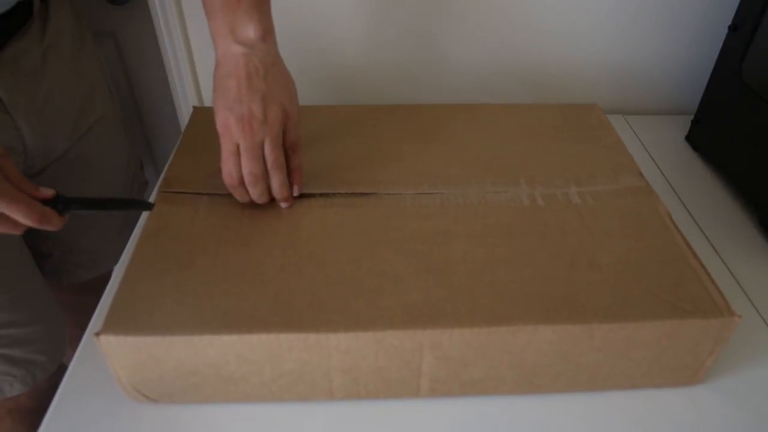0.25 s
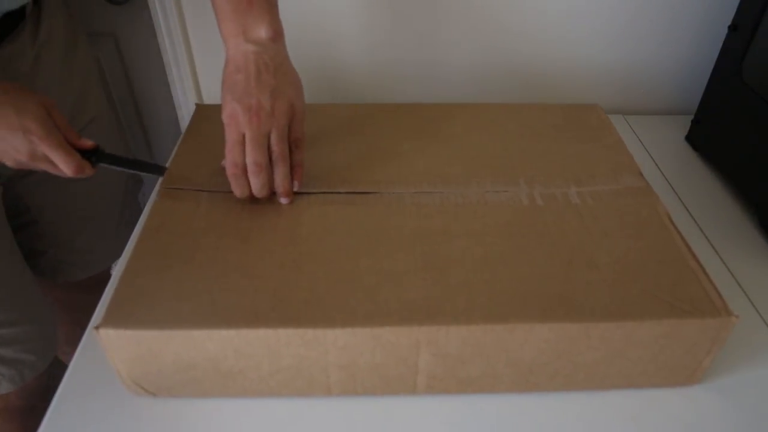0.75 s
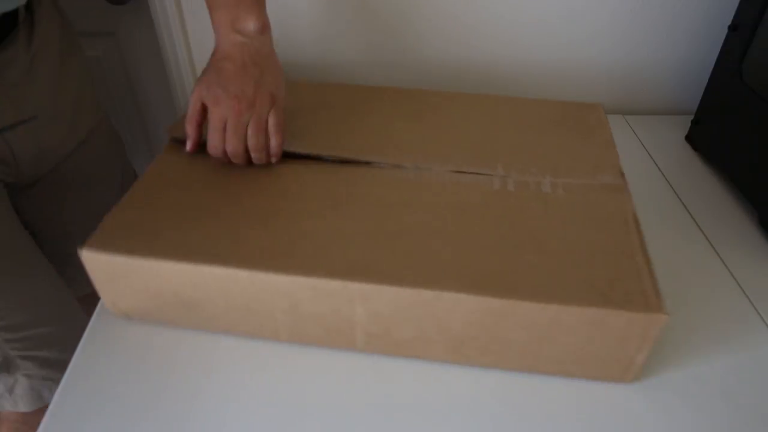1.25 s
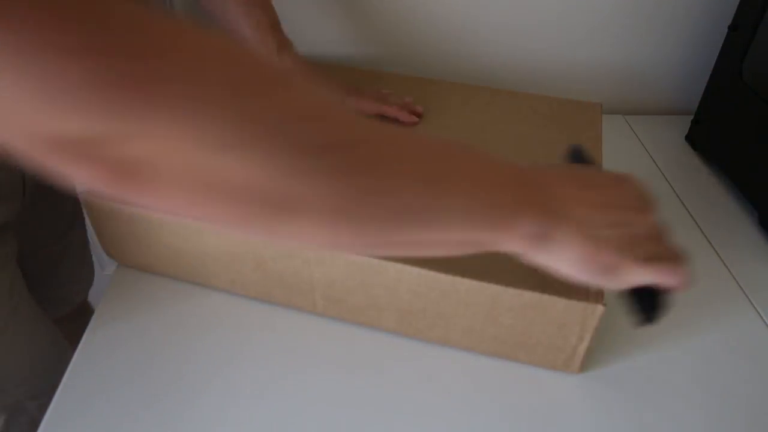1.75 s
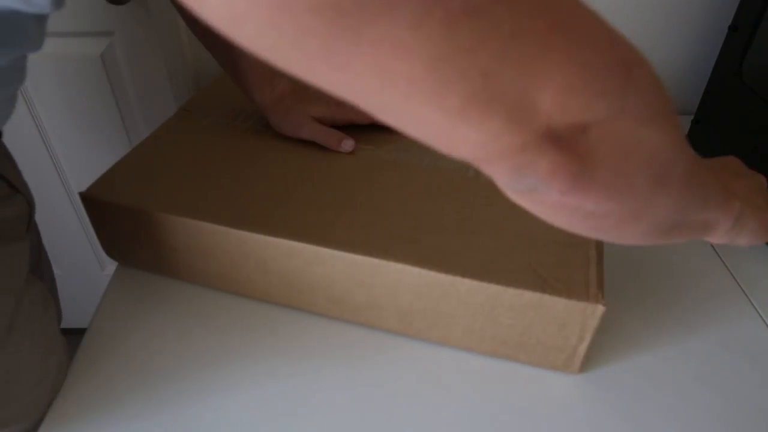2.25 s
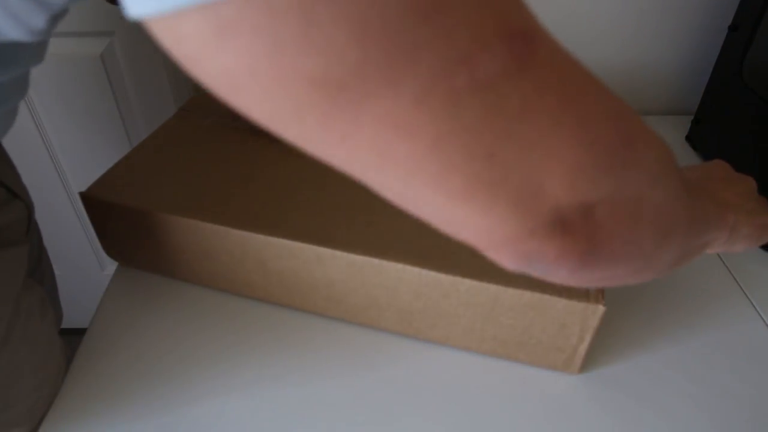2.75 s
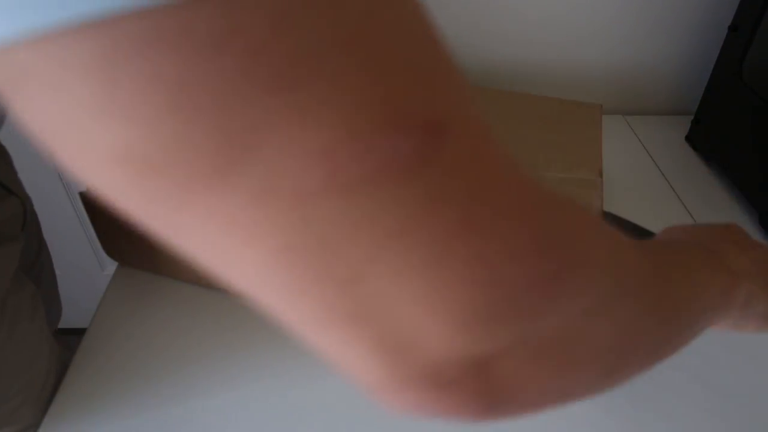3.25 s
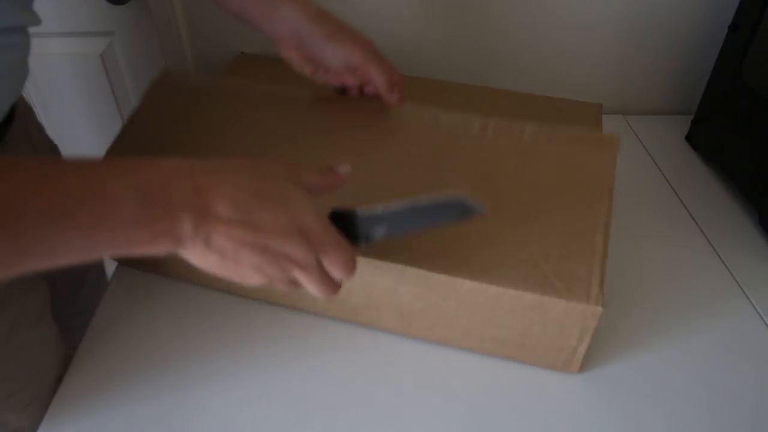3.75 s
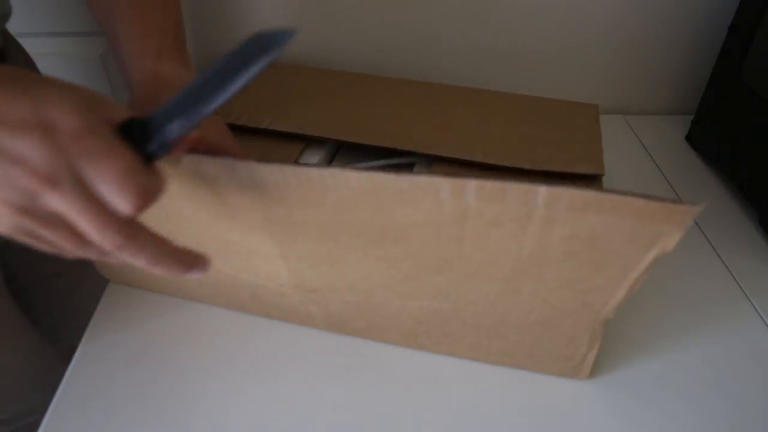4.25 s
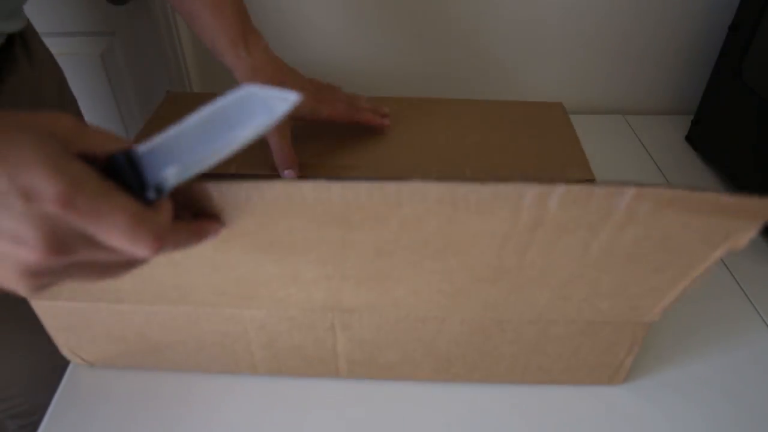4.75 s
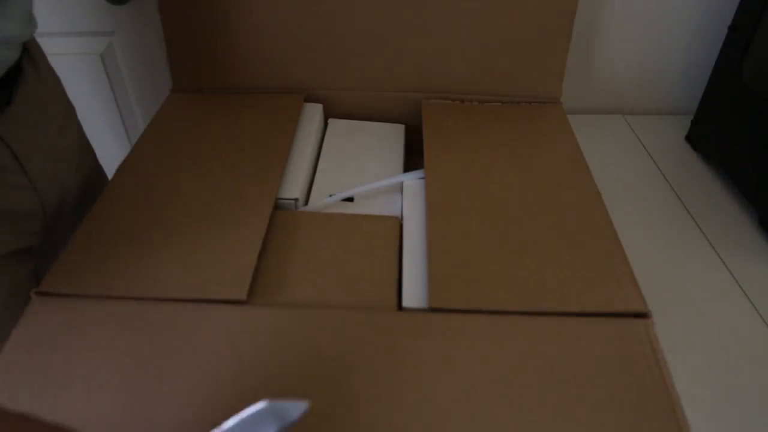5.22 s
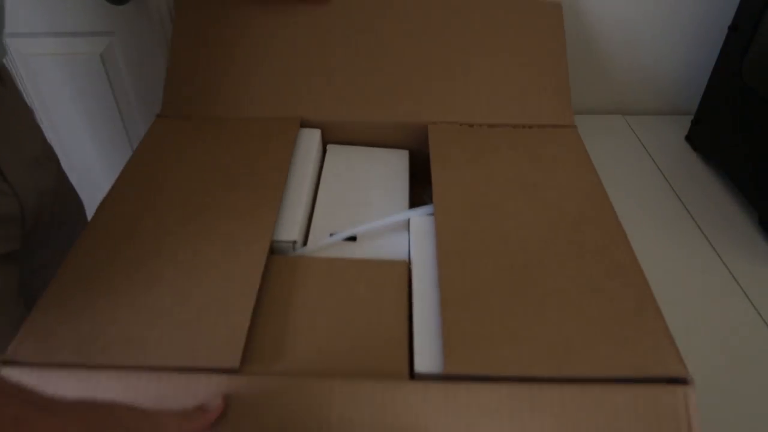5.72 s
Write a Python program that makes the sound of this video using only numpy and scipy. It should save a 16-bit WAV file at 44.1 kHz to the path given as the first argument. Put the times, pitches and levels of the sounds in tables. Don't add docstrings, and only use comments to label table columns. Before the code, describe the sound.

Close, mono, in a small quiet room with a faint low background hum. From 0 to 0.5 s a hand barely rustles on cardboard, with a light tick. From about 0.56 to 1.1 s a knife gives short, dry, grainy rasps through tape, ending in a crisp crack. From 1.15 to 1.6 s the box drags round with a louder scrape, a sharp snap at 1.4 and a hollow thump at 1.5; another strong crack comes near 1.65. Sparse cuts, bumps and faint steel scrapes follow until 2.9. A last cut at 3.0-3.3 bursts into quick bright cracks. Fingers fumble and tick softly, then a flap slides and creaks from 4.1 to 4.7, ending in a very loud, short, dull knock at 4.74. The far flap folds with a lighter rustle around 4.9-5.2, a knock sounds at 5.4, and a rough scraping pull swells from 5.6, with snaps and thumps at 5.9.

```python
import sys
import numpy as np
from scipy import signal
from scipy.fft import rfft, irfft
from scipy.io import wavfile
from scipy.ndimage import uniform_filter1d, map_coordinates

SR = 44100
rng = np.random.default_rng(int(sys.argv[2]) if len(sys.argv) > 2 else 0)


def makeup_ratio(level_db):
    decades = np.asarray(level_db, float) / 20
    return 10 ** decades


def store_wav(level_fs):
    pcm = np.round(np.clip(np.atleast_2d(level_fs), -1, 1) * 32767)
    wavfile.write(sys.argv[1], SR, pcm.T.astype(np.int16))


N = 263718
TIME = np.arange(N) / SR

# [pitch_hz, density_db per Hz]
QUIET_SPECTRUM = [(18, -29), (30, -7.5), (174, -2.5), (287, -19), (473, -17), (2350, -29), (10200, -31.5),
                  (11400, -29), (16000, -32)]
# [pitch_hz, t60_s]
ROOM_DECAY = [(100, 0.41), (1000, 0.0833), (4000, 0.1945), (12000, 0.067)]
# [pitch_hz, gain_db]
MIC_LIMIT = [(15700, 0), (15900, -22), (16350, -26), (16500, -90)]

# [pitch_hz, density_db per Hz]
SCRAPE_SPECTRUM = [(700, -51.5), (1200, -4.5), (1500, 3), (2000, 4.5), (2550, 1), (3000, 3.5), (3500, 7),
                   (3950, 2.5), (4500, -6), (5500, -16), (7200, -42.5), (12000, -82)]
# [pitch_hz, density_db per Hz]
HISS_SPECTRUM = [(2940, -15.5), (5000, -2.5), (7560, -3.5), (9550, -5.5), (10900, -5), (14700, -16),
                 (16000, -14)]
# [pitch_hz, density_db per Hz]
TAPE_SPECTRUM = [(700, -45), (1200, -7), (1600, 1), (2100, 2), (2600, 1), (3300, 6.5), (4000, 3),
                 (4600, -6), (5500, -16), (7200, -43.5)]
# [pitch_hz, width_hz, level_db]
PANEL_MODES = [(400, 175, 3), (590, 191, 4), (738, 249, 1), (1242, 390, -6.5)]
# [pitch_hz, width_hz, level_db]
HOLLOW_MODES = [(81, 11, -4.5), (142, 26, 1.5), (210, 50.5, 2), (268.6, 55, 4)]
# [pitch_hz, level_db, t60_s]
AIR_MODES = [(135, -3, 0.14), (280, -13, 0.1308), (454, -19.5, 0.12), (600, -13.5, 0.04)]
# [pitch_hz, width_hz, level_db]
BLADE_MODES = [(4450, 90, -9), (5000, 140, -11), (6060, 160, -6), (7480, 220, 0), (8640, 200, -15),
               (9750, 240, -11)]

# [start_s, level_db (peak), pitch_hz, t60_s]
DRUM_BLOWS = [(1.28, -35, 174, 0.051), (1.502, -15, 253, 0.082), (1.626, -29.5, 185, 0.058),
              (1.851, -31.5, 210, .061), (2.605, -36, 135, 0.12), (2.8096, -24.5, 195, 0.032),
              (3.151, -43, 319, .104), (3.181, -35.5, 210, 0.12), (3.703, -38, 197.6, 0.14),
              (3.747, -33, 193, 0.15), (3.763, -30, 90, 0.1), (4.172, -40.5, 157, 0.056),
              (4.514, -40.5, 85.5, 0.12), (4.867, -35, 107, 0.057), (5.9, -34, 400, 0.2),
              (5.935, -39, 290, .092), (1.41, -32.5, 215, 0.11), (1.335, -38, 110, 0.074),
              (2.385, -53.5, 200, 0.066), (2.606, -44, 138, .2), (2.81, -38, 138, .2), (3.2, -38, 250, .08)]
# [start_s, level_db (peak), pitch_hz, t60_s]
DAMPED_KNOCKS = [(.438, -42.5, 145.8, 0.1), (1.409, -22, 590, 0.041), (1.831, -29.5, 136.6, .0466),
                 (2.096, -22, 454, 0.02), (2.604, -32, 294, 0.021), (3.252, -37.5, 636, 0.017),
                 (3.254, -33, 1084, 0.02), (3.309, -42, 400, .042), (3.503, -38, 232, 0.037),
                 (4.034, -56, 145, 0.36), (4.7383, -0.5, 101, 0.02), (4.763, -31, 268, 0.037),
                 (4.812, -32.5, 180, .05), (4.842, -37, 130, .05), (2.096, -40, 715, 0.019),
                 (2.108, -36, 523, .04), (2.124, -39, 400, 0.037), (2.606, -40, 696, 0.019),
                 (2.795, -35.5, 400, .015), (2.81, -36, 750, 0.017), (5.399, -29.5, 423, 0.014),
                 (5.426, -33.5, 616, 0.018), (5.905, -35.5, 140, 0.11), (3.68, -44, 145, 0.09),
                 (3.735, -36, 142, .14), (4.9, -40, 230, .06), (2.384, -52, 480, .03),
                 (1.47, -39, 205, 0.049), (5.11, -39, 109, .047), (5.124, -36, 105, 0.064),
                 (5.392, -20.5, 337, 0.013), (5.956, -28.5, 210, .09)]
# [start_s, level_db (peak), pitch_hz, t60_s]
DESK_BUMPS = [(1.513, -25, 44.6, 0.15), (1.5, -45.5, 37, 0.24), (1.5, -50.5, 45, .17),
              (4.744, -21, 51, .141), (5.406, -17, 63, 0.057), (5.58, -51, 45, .177),
              (3.64, -49, 80, 0.092), (3.385, -53.5, 56, 0.09), (5.91, -38.5, 63, .12)]

# [start_s, end_s, level_db, pitch_hz (centre)]
SKIN_BRUSHES = [(1.14, 1.567, -56.5, 7500), (1.22, 1.5, -54, 3500), (1.2, 1.55, -58, 5000),
                (4.113, 4.177, -51.5, 7700), (4.117, 4.176, -52.5, 3020), (4.167, 4.22, -63, 10500),
                (4.28, 4.498, -61, 10400), (4.535, 4.6, -62, 12500), (4.54, 4.768, -60.5, 10700),
                (4.895, 4.994, -63, 10500), (5.604, 5.9, -64.5, 7950), (3.04, 3.3, -65, 11000),
                (2.59, 2.626, -69, 12000), (2.78, 2.83, -66, 12000), (5.4, 5.44, -68, 10500)]
# [start_s, end_s, level_db, pitch_hz]
CREASE_SQUEAKS = [(3.0, 3.135, -58, 3620), (4.25, 4.58, -55.5, 3490), (4.5, 4.76, -59, 3560),
                  (3.28, 3.375, -58.5, 8000), (0.3, 0.38, -72, 1760), (2.196, 2.321, -61, 1780),
                  (2.12, 2.332, -60, 520), (0.061, 0.25, -78, 1040), (5.9, 6.0, -41.5, 1150),
                  (3.85, 3.93, -62, 1150), (3.79, 3.83, -53, 2080), (3.79, 3.88, -61, 1400),
                  (5.52, 5.56, -55.5, 700), (3.6, 3.64, -66, 2050), (3.8, 3.88, -55, 349),
                  (4.035, 4.122, -61.5, 293), (4.028, 4.11, -62.5, 1430), (4.95, 5.07, -57, 1800),
                  (5.142, 5.175, -58, 2195), (5.157, 5.234, -63, 586), (5.19, 5.27, -60.5, 1400),
                  (5.235, 5.29, -62, 1360), (5.24, 5.3, -60, 3600), (3.6, 3.625, -62, 4000),
                  (0.45, .55, -63, 3700), (2.545, 2.605, -72, 1600), (2.53, 2.605, -68, 430),
                  (2.777, 2.8, -61, 1600), (2.243, 2.263, -50, 1860), (.437, 0.459, -51, 1095),
                  (0.285, 0.35, -70.5, 3500), (2.96, 3.02, -70, 497), (3.875, 3.9, -60, 5500),
                  (4.895, 4.915, -51, 505), (4.864, 4.885, -54, 870), (.72, .78, -52, 374),
                  (1.2, 1.4, -50, 1150), (4.45, 4.75, -58, 800), (5.515, 5.54, -61, 4300),
                  (5.471, 5.523, -52, 1280), (5.497, 5.552, -47.5, 1374)]
# [start_s, end_s, level_db, pitch_hz]
THIN_TONES = [(4.17, 4.58, -54, 3500), (4.0, 4.12, -66, 3650), (4.55, 4.75, -58, 3500),
              (2.245, 2.31, -66, 4430), (2.1, 2.128, -65, 6000), (2.1, 2.124, -66, 5050),
              (2.258, 2.293, -55.5, 480), (5.005, 5.06, -64, 1950), (5.08, 5.19, -65, 3250),
              (5.2, 5.3, -65, 1400), (3.86, 3.95, -60.5, 1155), (3.69, 3.73, -55, 3250),
              (3.47, 3.53, -60, 3250), (3.83, 3.87, -62, 3420), (0.275, 0.327, -68, 965)]

# [start_s, level_db (peak), brightness_db]
TAPE_PEELS = [(.5906, -33.5, 2.5), (.8454, -38, 4.5), (.8854, -44.5, 1.5), (.9773, -49.5, 8),
              (1.2278, -29.5, -10), (1.4049, -12.5, -9), (1.4181, -28, -1), (1.5808, -30.5, -14),
              (1.707, -22.5, -10), (1.8514, -38, -25), (1.9011, -35.5, -4), (2.0957, -38.5, -23.5),
              (2.5981, -31.5, -12.5), (3.1053, -28, -9), (3.6031, -47, -7), (4.1502, -35, -2),
              (4.796, -36, -5.5), (5.247, -38, -9), (5.3908, -33, -13), (5.9358, -22, -5.5)]
# [start_s, level_db (peak), brightness_db]
TAPE_SNAPS = [(.0438, -52, -5), (.2824, -47.5, -7), (.4374, -35.5, -12.5), (.5028, -34.5, -12.5),
              (.8342, -41, -8), (1.0086, -31.5, -4.5), (1.274, -30, -14), (1.3598, -33, -18.5),
              (1.6377, -35, 4.5), (1.8307, -32.5, -13), (1.9455, -29.5, -11), (2.251, -40.5, -8.5),
              (2.787, -42, -2.5), (2.794, -39, -1), (3.2523, -30, -29), (3.3667, -32.5, -5.5),
              (3.7483, -45, -23), (4.118, -40, 6), (4.8667, -27.5, -20), (5.9008, -21.5, -1.5)]
# [start_s, level_db (peak), brightness_db]
CREASE_BUCKLES = [(.3348, -56, -11), (.6233, -40, 7.5), (.6966, -49, -14.5), (.7484, -38.5, -15),
                  (1.499, -22, -16), (1.6267, -33.5, -8), (2.3815, -54, -1), (2.5489, -63.5, -7),
                  (2.8065, -34, -25), (3.2184, -34.5, 4.5), (3.3088, -52, -3), (3.4471, -50, -15),
                  (3.5015, -45, -1), (3.5432, -43.5, -21.5), (3.7042, -38, -24), (3.7316, -36, -22.5),
                  (3.7644, -42, -22), (3.7978, -41, -3), (3.8767, -51, -4), (4.7383, -30, -7.5),
                  (4.8963, -43, -17.5), (5.3767, -47, -16), (5.3985, -34, -27), (5.4255, -40, -18),
                  (5.455, -47, -20), (5.475, -47, -20)]
# [start_s, level_db (peak), brightness_db]
TAPE_CRACKS = [(1.0258, -22, -0.5), (1.6552, -12.5, -14.5), (3.1415, -24, -6), (3.1618, -18, 0.5),
               (3.1787, -18.5, -1.5)]
# [start_s, level_db (peak), brightness_db]
FINGER_TICKS = [(.4945, -46, 14), (.504, -36, -12), (1.0268, -24, -2), (1.5, -28, -14), (1.831, -36, -10),
                (3.447, -46, -12), (3.503, -44, -12), (2.255, -42, -6), (3.4687, -48, -10),
                (3.654, -47, -7), (3.718, -38, -14), (3.733, -34, -8), (3.747, -33, -12), (3.762, -35, -14),
                (3.845, -44, -12), (3.885, -44, -6), (4.118, -40, 0), (3.181, -30, -12), (.745, -38, -6),
                (.835, -40, -6), (5.392, -34, -10), (5.401, -34, -12), (3.8, -45, -8), (4.739, -46, -8),
                (4.757, -42, 0), (4.857, -50, -2), (5.41, -42, -7), (5.518, -44, -12), (3.11, -35.5, -6),
                (3.225, -37, -6), (1.52, -38, -4)]

# [start_s, end_s, level_db, pitch_ratio to the blade at rest]
BLADE_STROKES = [(2.09, 2.129, -75, 1.0), (2.17, 2.27, -63, 1.005), (2.236, 2.268, -62, .965),
                 (2.374, 2.409, -73.5, 0.96), (2.597, 2.609, -56.5, 1.0), (2.783, 2.824, -57, 1.0),
                 (2.54, 2.56, -76, 1.0)]
# [time_s, speed_db, weight_db (on the card, over the speed)]
LONG_SLIDES = [
    (-4.5, -1.5, [(0, -81.5, 8.5), (.116, -73.5, 5), (.31, -89, 7), (.54, -71, 4), (.708, -66, 4.5), (.81, -69.5, 4), (1.11, -77, 2)]),
    (-6.5, 3, [(1.11, -66.5, -4), (1.2, -52.5, -6), (1.304, -46.5, -2), (1.456, -47, -1.5), (1.526, -47, 8), (1.6, -67, 10.5), (1.666, -62, 9.5), (1.8, -83, -8)]),
    (-14, -1.5, [(1.8, -76, -1), (1.876, -57, -11), (1.924, -74, 3), (2.066, -66, 5), (2.156, -70.5, 12.5), (2.282, -85, 15.5), (2.35, -85, -2)]),
    (-2, 3.5, [(2.95, -87, 6), (3.078, -60, -1.5), (3.184, -55.5, 8.5), (3.234, -55.5, 5.5), (3.302, -61, 1), (3.42, -79.5, 4)]),
               (-1.5, 2.5, [(3.42, -80, 8.6), (3.542, -68.5, 11.7), (3.692, -77.5, 2.7), (3.736, -74.5, 31.6), (3.812, -70, 4.5), (3.878, -63, 2), (3.98, -81.5, 2.2)]),
    (-8.5, -3, [(3.98, -74, -6), (4.092, -63, 0), (4.15, -53, 2.5), (4.252, -57, -2.5), (4.302, -52, -4.5), (4.58, -51, -2), (4.72, -49, -4.5), (4.77, -54, 9), (4.85, -67.5, 3)]),
    (-8.5, -8, [(4.85, -69.5, 18), (4.924, -51, 2), (5.018, -58, 1), (5.12, -59.5, 2.5), (5.218, -64.5, -2), (5.33, -75.5, 5)]),
    (-11, -3, [(5.33, -78, 4), (5.446, -66.5, 12), (5.558, -63.5, 10.5), (5.658, -49.5, -1.5), (5.774, -45.5, -0.5), (5.862, -48, 1), (5.98, -59, -4)]),
]
# [start_s, end_s, speed_db, weight_db]
SAW_STROKES = [(.561, .616, -52.5, 3), (.602, .665, -51.5, 2.5), (.703, .792, -54, 6),
               (.819, .927, -57.5, 8.5), (.958, 1.099, -53.5, -1), (1.829, 1.917, -59.5, 4),
               (1.893, 1.99, -52, 1), (2.559, 2.684, -67, 10.5), (2.771, 2.88, -63.5, 8.5),
               (3.123, 3.234, -49.5, 4), (4.115, 4.19, -53, -16)]
# [start_s, end_s, speed_db, weight_db]
HAND_PRESSES = [(.265, .408, -81.5, 11), (2.175, 2.291, -72, 15), (3.431, 3.609, -61.5, -8),
                (3.643, 3.845, -56, 6), (3.814, 3.927, -64.5, 3), (5.508, 5.547, -54, -2),
                (5.893, 6.011, -41, 6.5)]


def unit(x):
    return x / np.sqrt(np.mean(x ** 2) + 1e-20)


def along(points, hz):
    f, v = np.transpose(points)
    return np.interp(np.log(hz + 1), np.log(f + 1), v)


def wobble(rate):
    knots = rng.standard_normal(int(N * rate / SR) + 4)
    return map_coordinates(knots, [TIME * rate])


def response(shape):
    f = np.fft.rfftfreq(2 ** 14, 1 / SR)
    if len(shape[0]) == 3:
        spectrum = 0
        for k, (hz, width, db) in enumerate(shape):
            resonance = 1j * f * width / (hz * hz - f * f + 1j * f * width)
            spectrum = spectrum + (-1) ** k * makeup_ratio(db) * resonance
        h = irfft(spectrum)
    else:
        cepstrum = irfft(np.log(makeup_ratio(np.maximum(along(shape, f), -70))))
        cepstrum[1:len(f) - 1] *= 2
        cepstrum[len(f):] = 0
        h = irfft(np.exp(rfft(cepstrum)))
    return h[:len(f)] / np.linalg.norm(h[:len(f)])


def through(shape, x):
    return signal.fftconvolve(x, response(shape))[:N]


def swell(start, end, edge=1.8, lean=.722):
    out, span = np.zeros(N), slice(int(start * SR), int(end * SR))
    progress = np.clip((TIME[span] - start) / (end - start), 0, 1)
    out[span] = np.abs(np.sin(np.pi * progress ** lean)) ** edge
    return out


def bending(x, depth_db, bins=2, frames=8):
    z = signal.stft(x, nperseg=512)[2]
    field = rng.standard_normal(z.shape)
    for axis, size in enumerate((bins, frames)):
        field = uniform_filter1d(field, size, axis)
        field = uniform_filter1d(field, size, axis)
    gain = makeup_ratio(depth_db * unit(field))
    gain = gain / np.sqrt(np.mean(gain ** 2))
    return signal.istft(z * gain, nperseg=512)[1][:N]


def grains(clump_db, tick_db, bend_db):
    clumps = clump_db * (wobble(30) + 0.3 * wobble(120))
    slips = tick_db * np.abs(wobble(700))
    return unit(makeup_ratio(clumps + slips) * bending(rng.standard_normal(N), bend_db))


def background_quiet():
    return makeup_ratio(-71.5 + 0.4 * wobble(5)) * through(QUIET_SPECTRUM, rng.standard_normal(N))


def room(x):
    out, step = np.zeros(N + SR), SR // 3
    delay = 180
    for k in range(0, N, step):
        hz, t, z = signal.stft(rng.standard_normal(SR // 3), SR, nperseg=256)
        decay = makeup_ratio(-60 * t / along(ROOM_DECAY, hz)[:, None])
        tail = signal.istft(z * decay, SR, nperseg=256)[1]
        wet = signal.fftconvolve(x[k:k + step], tail / np.linalg.norm(tail))
        out[k + delay:][:len(wet)] += wet
    return out[:N]


def thumps():
    out, t = np.zeros(N + SR), np.arange(SR // 2) / SR
    # how much the air rings, dB
    for rows, air_db in ((DRUM_BLOWS, -4.5), (DAMPED_KNOCKS, -20), (DESK_BUMPS, -19.5)):
        for s, db, hz, t60 in rows:
            panel = makeup_ratio(-60 * t / t60) * np.sin(2 * np.pi * hz * t)
            air = np.zeros(len(t))
            for f, level, ring in AIR_MODES:
                level_chance, pitch_chance = rng.standard_normal(2)
                fall = makeup_ratio(air_db + level + 1.9 * level_chance - 60 * t / ring)
                air += fall * np.sin(2 * np.pi * f * (1 + 0.013 * pitch_chance) * t)
            onset = 1 - np.exp(-t * hz / 0.34)
            out[round(s * SR):][:len(t)] -= makeup_ratio(db + 5.5) * (panel + air) * onset
    return out[:N]


def brushing():
    out, nap = np.zeros(N), bending(rng.standard_normal(N), 1.6)
    for a, b, db, hz in SKIN_BRUSHES:
        span = slice(int(a * SR), int(b * SR))
        skin = [(hz, .42 * hz, 0)]
        rub = (nap * makeup_ratio(db - 4) * swell(a, b, edge=.7, lean=1.1))[span]
        out[span] += through(skin, through(skin, rub))[:len(rub)]
    return out


def squeaks():
    out, fibres = np.zeros(N), grains(clump_db=1.4, tick_db=2.5, bend_db=1.6)
    for rows, width, edge in ((CREASE_SQUEAKS, .12, 1.86), (THIN_TONES, .035, .9)):
        for a, b, db, hz in rows:
            span = slice(int(a * SR), int(b * SR) + SR // 10)
            rub = (fibres * makeup_ratio(db - 13.0) * swell(a, b, edge))[span]
            near_pitch = through([(hz, 0.35 * hz, 0)], rub)
            modes = [(hz, width * hz, 0), (1.59 * hz, 0.11 * hz, -12)]
            out[span] += through(modes, near_pitch)[:len(rub)]
    return out


def snaps():
    lead = SR // 50
    force, t = np.zeros((3, N + SR)), np.arange(-lead, SR // 8) / SR
    stretch = np.array([[1.1], [.9], [1.4]])
    kinds = ((TAPE_PEELS, -11.5, .019, .6), (TAPE_SNAPS, -.5, .019, .35), (CREASE_BUCKLES, 7.5, .02, .4),
             (TAPE_CRACKS, -9, .012, .6), (FINGER_TICKS, -4, .009, .5))
    for rows, panel_db, t60, gather in kinds:
        late = (t - .19 * t60) / (t60 * stretch)
        burst = 1 / (makeup_ratio(60 * late) + makeup_ratio(-60 * late / gather))
        for s, db, hiss_db in rows:
            levels_db = db - 10 + np.array([[0], [hiss_db], [panel_db]])
            force[:, round(s * SR):][:, :len(t)] += makeup_ratio(levels_db) * burst
    force = force[:, lead:N + lead] * grains(clump_db=.6, tick_db=2.4, bend_db=2.6)
    return through(TAPE_SPECTRUM, force[0]) + through(HISS_SPECTRUM, force[1]) + through(PANEL_MODES, force[2])


def blade():
    out, fibres = np.zeros(N), grains(clump_db=1.2, tick_db=3, bend_db=1.2)
    for a, b, db, bent in BLADE_STROKES:
        grip = rng.standard_normal(len(BLADE_MODES))
        modes = [(hz * bent, w, level / 2 + .6 * g) for (hz, w, level), g in zip(BLADE_MODES, grip)]
        once = response(modes)
        steel = signal.fftconvolve(once, once)
        rub = fibres * makeup_ratio(db) * swell(a, b)
        out += signal.fftconvolve(rub, steel / np.linalg.norm(steel))[:N]
    return out


def shares(speed_db, weight_db, hiss_db, hollow_db):
    hiss = speed_db + hiss_db + .18 * (speed_db + 50.5)
    panel = speed_db + weight_db
    return makeup_ratio(np.array([speed_db, hiss, panel, panel + hollow_db]))


def rubbing():
    slides, strokes = np.zeros((2, 4, N))
    for hiss_db, hollow_db, course in LONG_SLIDES:
        s, speed_db, weight_db = np.transpose(course)
        speed = np.interp(TIME, s, speed_db, -200, -200)
        slides += shares(speed, np.interp(TIME, s, weight_db), hiss_db, hollow_db)
    for rows, hiss_db, hollow_db in ((SAW_STROKES, -3, -1), (HAND_PRESSES, -11, -2.5)):
        for a, b, speed_db, weight_db in rows:
            strokes += shares(speed_db, weight_db, hiss_db, hollow_db)[:, None] * swell(a, b)
    force = slides * grains(clump_db=.6, tick_db=2.8, bend_db=1.4)
    force += strokes * grains(clump_db=1.1, tick_db=3, bend_db=2.4)
    bodies = (SCRAPE_SPECTRUM, HISS_SPECTRUM, PANEL_MODES, HOLLOW_MODES)
    return sum(through(body, f) for body, f in zip(bodies, force))


def scene():
    sharp, soft = snaps() + blade(), thumps()
    reflected = room(makeup_ratio(-10.5) * sharp + makeup_ratio(-15.5) * soft)
    mix = background_quiet() + reflected + soft + brushing() + squeaks() + sharp + rubbing()
    return mix[None]


def band_limit(x):
    return signal.sosfilt(signal.butter(12, 16500, fs=SR, output="sos"), x)


def record(dry):
    heard = signal.sosfilt(signal.butter(5, 39, "high", fs=SR, output="sos"), dry)
    treble_gain = makeup_ratio(along(MIC_LIMIT, np.fft.rfftfreq(N, 1 / SR)))
    heard = irfft(rfft(heard) * treble_gain, N)
    return band_limit(heard)


dry = scene()
out = record(dry)
store_wav(out)
```